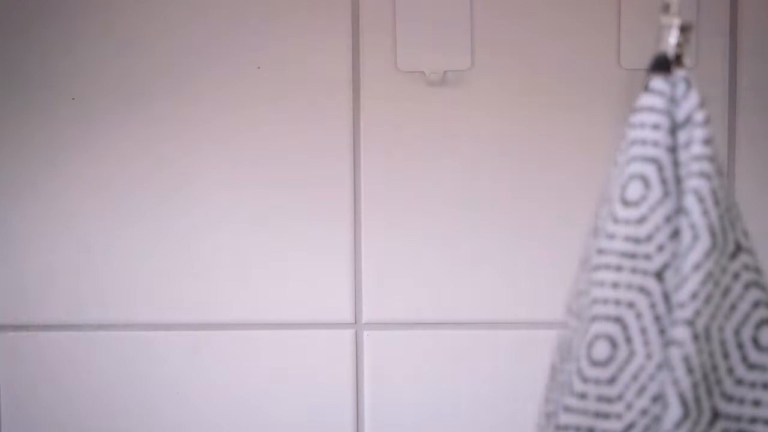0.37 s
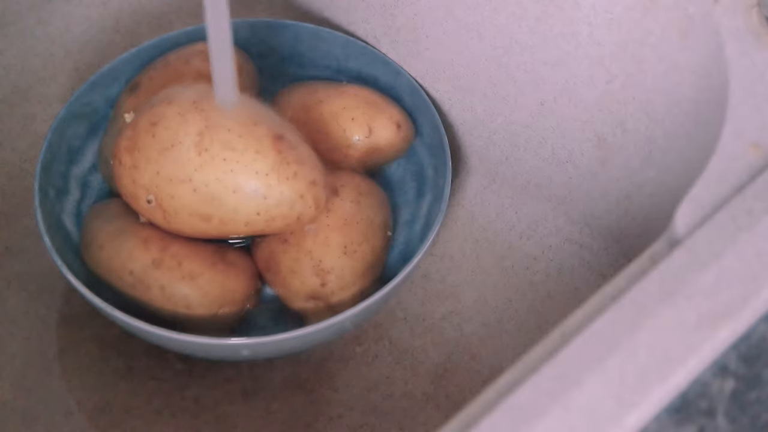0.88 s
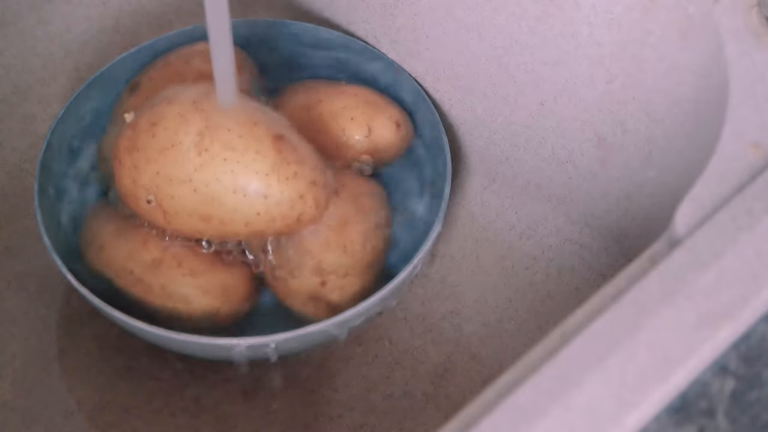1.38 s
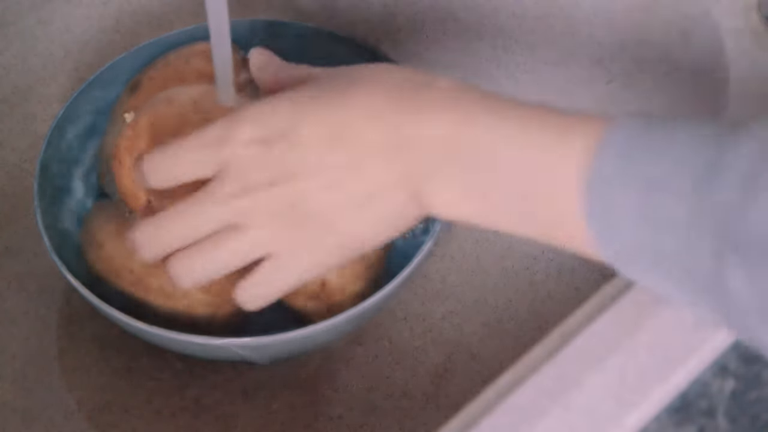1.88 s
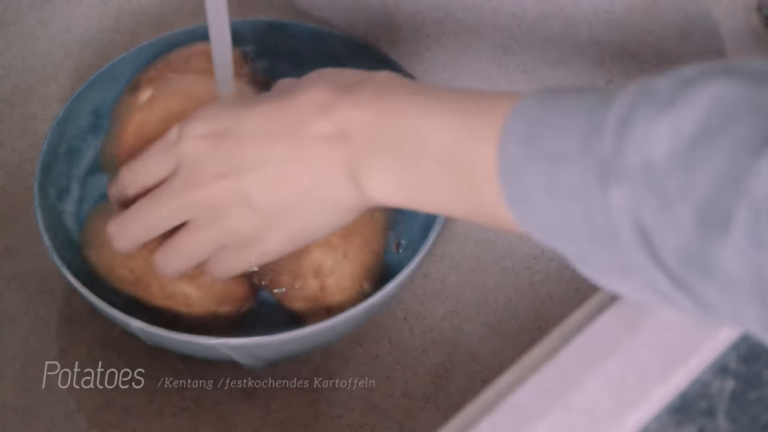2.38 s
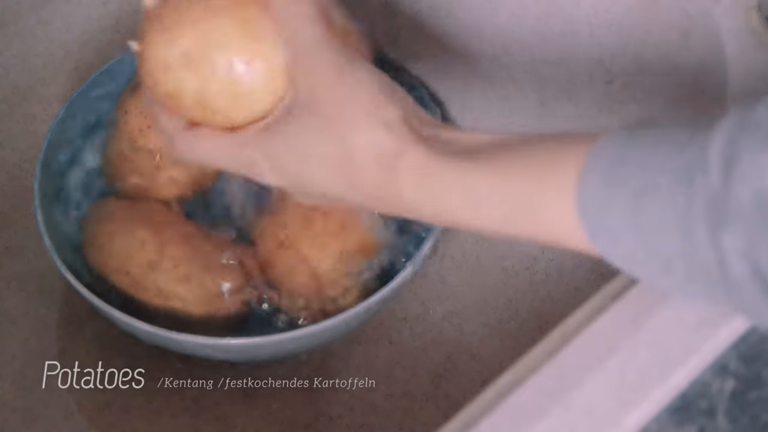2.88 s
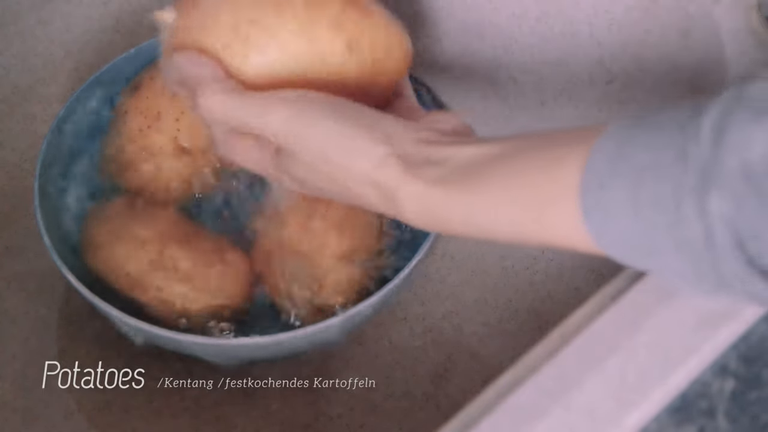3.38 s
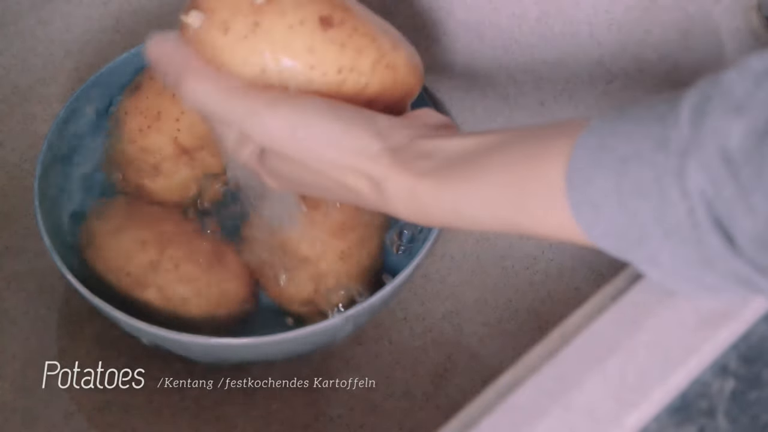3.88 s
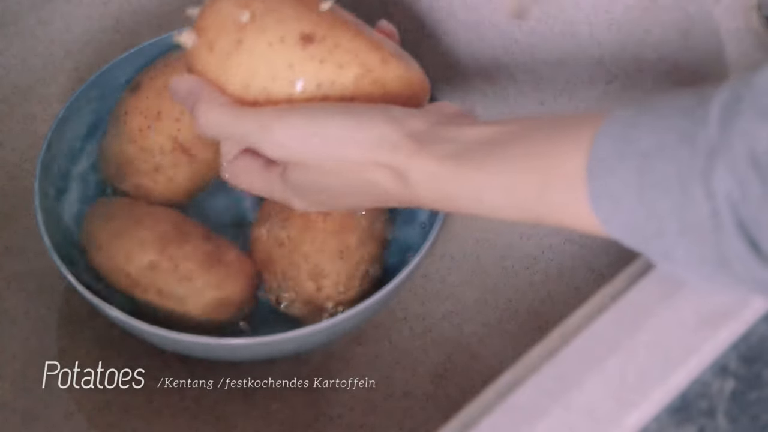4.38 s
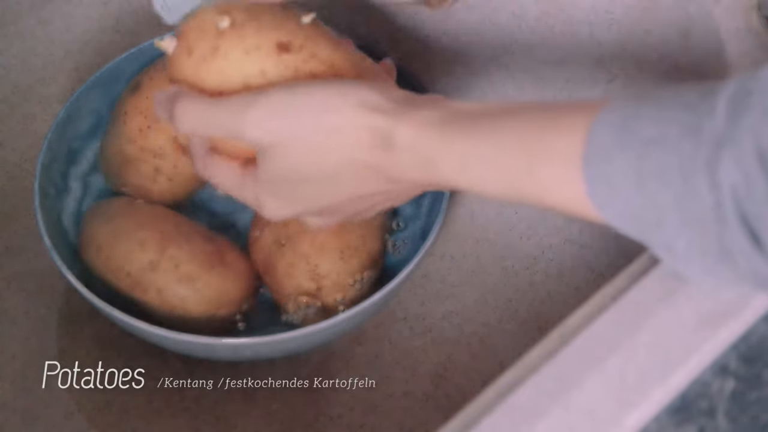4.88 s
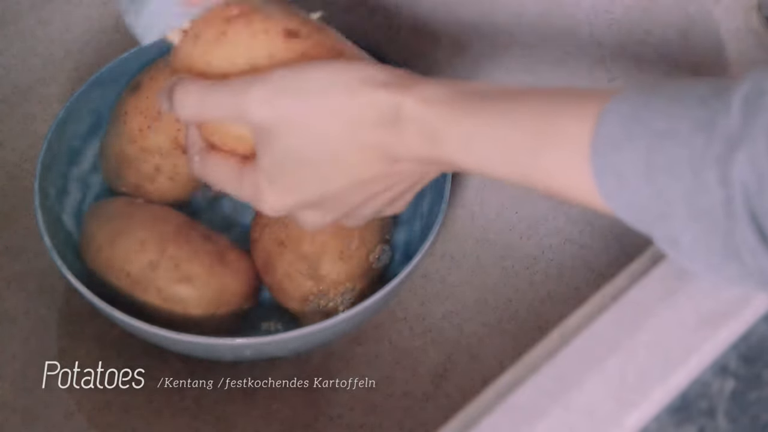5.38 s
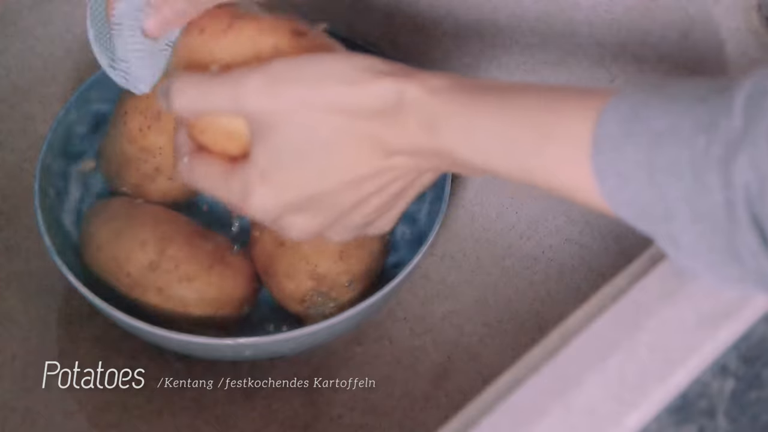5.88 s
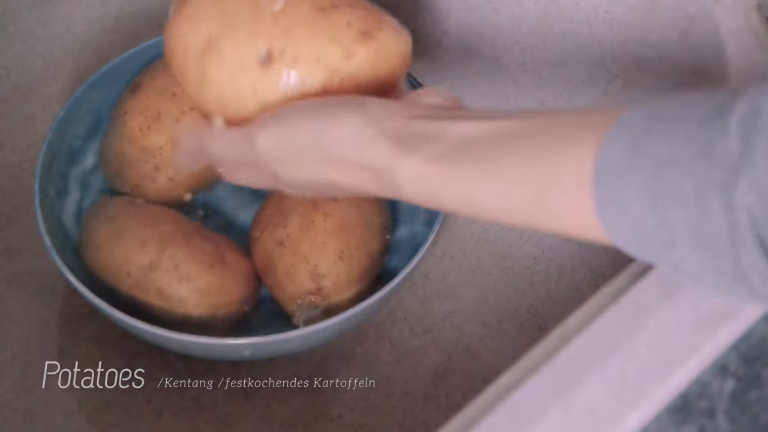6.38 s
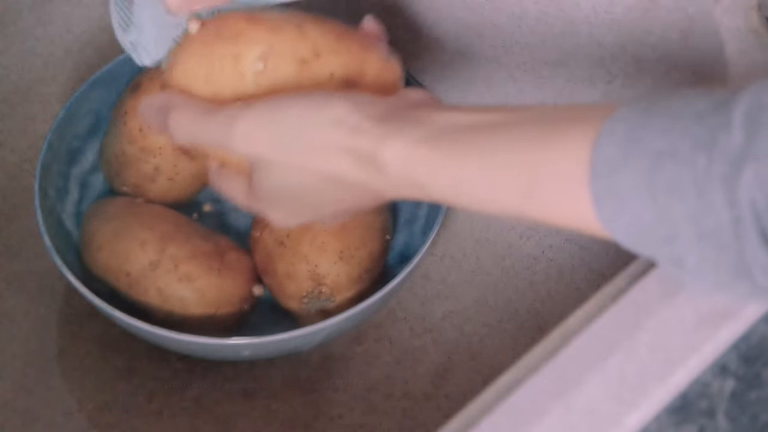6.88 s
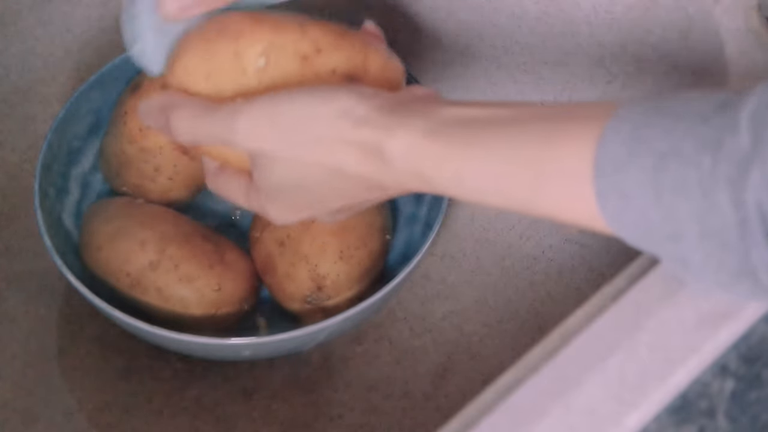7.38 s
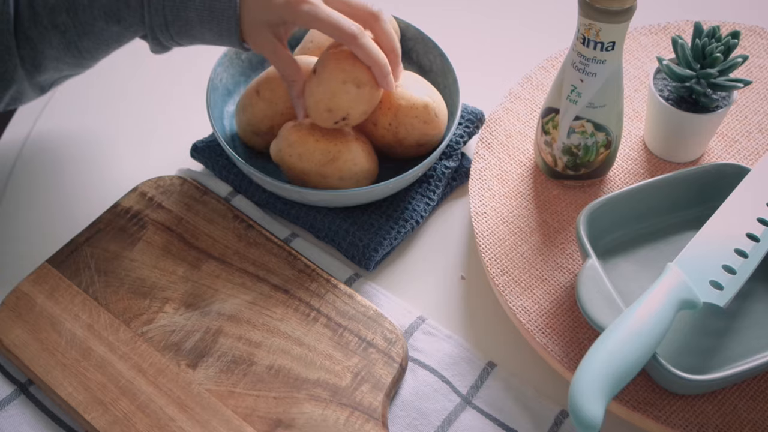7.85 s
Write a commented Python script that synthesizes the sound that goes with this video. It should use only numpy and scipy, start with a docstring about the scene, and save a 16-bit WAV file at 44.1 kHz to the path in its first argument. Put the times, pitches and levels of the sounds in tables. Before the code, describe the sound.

The first 0.75 seconds are a very quiet kitchen: low room noise, faint buzz and tones, one soft rustle at 0.1. A hard cut brings a close tap spray, full by about 1, crackling brightly over potatoes with heavier splashes and bubbling that thickens as the bowl fills. From 1.9 a hand shifts the potatoes; clear ceramic knocks ring near 2.5 and 2.6, then around 3.8. The tap stops about 4.0 to 4.1. Drops plink with rising pitch, wet hands squeak and crackle, and potatoes bump the bowl until 5.5. From 5.1 a rubber brush scrubs in short fizzy rasps, roughly eight per second, growing stronger to 6.3 with sharp wet snaps. It pauses, a few drips sound near 6.8, and strokes resume until 7.8. A hard cut at 7.9 returns to quiet room tone, a tiny tick and a soft low thud at 8.1.

```python
"""Potatoes under the tap

A kitchen tap sprays onto potatoes in a glazed bowl: crackling noise grains over splashes and ringing bubbles.
A hand shifts them and they knock the bowl (ringing modes); the tap shuts and drops fall (rising sines).
Then a rubber brush scrubs a wet potato in quick strokes: a fizz of fine ticks, a resonant rasp, sharp snaps.
The quiet kitchen (shaped noise, a buzz, faint tones) is heard alone before and after, joined by hard cuts."""
import sys
import numpy as np
from scipy import signal
from scipy.fft import rfft, irfft, next_fast_len
from scipy.io import wavfile
from scipy.ndimage import uniform_filter1d

SR = 44100
rng = np.random.default_rng(int(sys.argv[2]) if len(sys.argv) > 2 else 0)


def master(y):
    """Save y as 16-bit WAV."""
    cut = np.clip(np.atleast_2d(y).T, -1, 1)
    pcm = np.round(cut * 32767)  # scale
    wavfile.write(sys.argv[1], SR, pcm.astype(np.int16))


def invert_db(level):
    """Linear amplitude ratio for a level in decibels (20 dB per decade), elementwise."""
    return 10 ** (np.asarray(level, dtype=float) / 20)


N = 363384
SINK_END_S = 7.887   # hard cut back to the quiet kitchen


def rms_one(x):
    """Scale to unit power."""
    return x / np.sqrt(np.mean(x ** 2) + 1e-20)


def seconds():
    """Time of every sample."""
    return np.arange(N) / SR


def in_time(rows):
    """Columns of a curve at every sample; silent outside it."""
    s, *columns = np.transpose(rows)
    return [np.interp(seconds(), s, column, left=-150, right=-150) for column in columns]


def at_hz(points, hz):
    """Read a spectrum on a log-frequency axis."""
    point_hz, value = np.transpose(points)
    return np.interp(np.log(hz + 1), np.log(point_hz), value)


def summed_db(*levels_db):
    """Levels add as powers."""
    return 10 * np.log10(sum(invert_db(2 * db) for db in levels_db))


def drift(corner_hz):
    """Slow random curve of unit power: noise through two equal poles, drawn every 40 samples."""
    pole = np.exp(-80 * np.pi * corner_hz / SR)
    noise = rng.standard_normal(N // 40 + 2002)
    slow = signal.lfilter([1], [1, -2 * pole, pole * pole], noise)[2000:]   # settled part only
    return np.interp(np.arange(N) / 40, np.arange(len(slow)), rms_one(slow))


def dying(clicks, t60):
    """Each click starts at once and dies away, 60 dB in t60 seconds."""
    return signal.lfilter([1], [1, -invert_db(-60 / (t60 * SR))], clicks + 1e-18)


def ring(clicks, hz, t60):
    """A unit click sets a sine of height 1 ringing."""
    radius = invert_db(-60 / (t60 * SR))
    angle = 2 * np.pi * hz / SR
    return signal.lfilter([0, np.sin(angle)], [1, -2 * radius * np.cos(angle), radius * radius], clicks + 1e-18)


def clicks_at(rows, db):
    """One click for each event, timed by the first column."""
    out = np.zeros(N)
    out[(np.array(rows)[:, 0] * SR).astype(int)] = invert_db(db)
    return out


def bright(x, low_hz):
    """Keep the treble only."""
    return signal.sosfilt(signal.butter(2, low_hz, "high", fs=SR, output="sos"), x)


# Stereo width of the noise: pitch_hz, left_right_likeness (0..1)
LIKENESS = [(30, .93), (70, .88), (140, .82), (250, .66), (500, .9), (1000, .96), (2000, .75), (4000, .28),
            (8000, .35), (15000, .42)]


def coloured(envelope, spectrum):
    """Stereo noise under an envelope, filtered to a colour of unit gain; mid and side set its width."""
    size = next_fast_len(N)
    hz = np.arange(size // 2 + 1) * SR / size
    gain = rms_one(invert_db(at_hz(spectrum, hz)))
    alike = np.clip(at_hz(LIKENESS, hz), 0, .99)
    mid, side = rfft(envelope * rng.standard_normal((2, N)), size) * gain
    side = side * np.sqrt((1 - alike) / (1 + alike))
    mid, side = irfft(mid, size)[:N], irfft(side, size)[:N]
    return np.array([mid + side, mid - side])


def grains(per_s, spread_db, t60, share, clump_db):
    """Envelope of tiny bursts at random, in clumps, over a smooth bed; unit power."""
    sizes = invert_db(2 * spread_db * np.minimum(rng.exponential(1, N), 4))
    born = rng.random(N) < per_s * invert_db(clump_db * drift(25)) / SR
    power = dying(sizes * born, t60)
    share = np.clip(share, 0, 1)
    return np.sqrt(1 - share + share * power / power.mean())


def ticks(per_s, spread_db):
    """Lone sharp clicks of either sign, in clumps; unit power."""
    sizes = invert_db(spread_db * np.minimum(rng.exponential(1, N), 5)) * rng.choice([-1, 1], N)
    born = rng.random(N) < per_s * invert_db(4.0 * drift(20)) / SR
    return rms_one(sizes * born)


def blips(per_s, low_hz, high_hz, cycles):
    """Random clicks ring for some cycles at pitches scattered over 16 steps; unit power."""
    sizes = invert_db(3.4 * np.minimum(rng.exponential(1, N), 4)) * (rng.random(N) < per_s / SR)
    dealt = rng.integers(0, 16, N)
    pitches = np.geomspace(low_hz, high_hz, 16)
    return rms_one(sum(ring(sizes * (dealt == k), hz, cycles / hz) for k, hz in enumerate(pitches)))


def lumpy(x, depth_db):
    """Makes noise lumpy: narrow pitch regions swell and fade for some 50 ms each."""
    cells = signal.stft(x, nperseg=1024)[2]
    chance = rng.standard_normal(cells.shape[1:])
    chance = uniform_filter1d(uniform_filter1d(chance, 4, axis=0), 3, axis=1)
    gain = rms_one(invert_db(depth_db * rms_one(chance)))
    return signal.istft(cells * gain, nperseg=1024)[1][:, :N]


def swells(starts, lengths, peaks_db, rise, push, fall):
    """Level in dB of overlapping events: a ramp up to the start, another over the length, a ramp down (dB/s)."""
    t, power = np.arange(0, N, 32) / SR, 1e-15
    for s, length, db in np.broadcast(starts, lengths, peaks_db):
        to_peak = s + length - t
        climb = push * np.minimum(to_peak, length) + rise * np.maximum(s - t, 0)
        below_peak_db = np.where(to_peak > 0, climb, -fall * to_peak)
        power = power + invert_db(2 * np.maximum(db - below_peak_db, -200))
    return np.interp(seconds(), t, 10 * np.log10(power))


# Movement at the sink: time_s, murmur_db (room and water, before each layer's trim),
# leaning_db (hands and arms leaning on the sink)
HANDLING = [(0, -72.5, -79), (.63, -73.5, -79.5), (.74, -81, -90), (.84, -61, -69), (1.0, -59, -70.5),
            (1.7, -60, -69.5), (2.0, -57, -70), (2.7, -55.5, -65), (3.3, -58, -65.5), (4.2, -61, -64),
            (4.4, -61.5, -69), (4.72, -62.5, -66.5), (6.1, -60.5, -63), (6.39, -61, -62), (6.6, -68, -77),
            (6.77, -68, -73), (6.87, -58, -64), (7.4, -56.5, -61), (7.885, -61, -65.5), (7.9, -67, -67),
            (8.24, -66.5, -71.5)]
# Colour of the leaning rumble: pitch_hz, relative_db_per_hz
RUMBLE_COLOUR = [(12, -25), (20, 2.5), (54, 3), (90, -9), (120, -38), (200, -120)]


def rumble():
    """Hands and arms leaning on the sink: wavering deep noise."""
    leaning_db = in_time(HANDLING)[1] + 3 * drift(5.8)
    return coloured(invert_db(leaning_db), RUMBLE_COLOUR)


# Dull thumps through the basin: hit_s, level_db
THUMPS = [(1.99, -61), (3.05, -59), (3.25, -58), (3.53, -60), (3.9, -57.5), (4.36, -53), (4.51, -60),
          (6.87, -73)]
# Colour of the basin: pitch_hz, relative_db_per_hz
BASIN_COLOUR = [(53, -43.5), (90, -16), (129, -1.5), (250, -16), (320, -35.5), (550, -120)]
BASIN_DB, BASIN_FOLLOWS, BUSY_DB = -69.5, 1.07, -59.5   # level at a busy murmur, share of its swing
BASIN_SETTLES_S, BASIN_SETTLES_DB = 5.4, 3   # quieter once no water reaches it


def basin():
    """The basin drums with the water's movement, and dull thumps come through it."""
    murmur_db = in_time(HANDLING)[0]
    drum_db = BASIN_DB + BASIN_FOLLOWS * (murmur_db - BUSY_DB) + 2.5 * drift(3.8)
    drum_db -= BASIN_SETTLES_DB * (seconds() > BASIN_SETTLES_S)
    hit_s, thump_db = np.transpose(THUMPS)
    thumps_db = swells(hit_s, 0, thump_db, rise=400, push=0, fall=90)
    return coloured(invert_db(summed_db(drum_db, thumps_db)), BASIN_COLOUR)


# Colour of the low noise at the sink: pitch_hz, relative_db_per_hz
SINK_COLOUR = [(120, -29), (200, 1.5), (490, -3.5), (539, 7), (738, -0.5), (848, 1), (1200, -3.5),
               (1600, -24), (2080, -32), (3520, -120)]
# Colour of the low noise in the quiet kitchen: pitch_hz, relative_db_per_hz
STILL_ROOM_COLOUR = [(60, -12), (120, -3), (300, -2.5), (600, -1.5), (1200, -7), (2000, -30), (3500, -120)]
AT_SINK_S = (.75, SINK_END_S)   # the part at the sink, between the hard cuts


def murmur():
    """Low noise at the sink, lumpy in pitch and time; smooth duller noise in the quiet kitchen."""
    level = invert_db(in_time(HANDLING)[0] - 5.0)
    at_sink = (seconds() > AT_SINK_S[0]) * (seconds() < AT_SINK_S[1])
    sink_noise = lumpy(coloured(level, SINK_COLOUR), depth_db=4.0)
    return np.where(at_sink, sink_noise, coloured(level, STILL_ROOM_COLOUR))


# Colour of the broad hiss: pitch_hz, relative_db_per_hz
AIR_COLOUR = [(590, -59), (1000, -66), (1290, -17), (1390, -12), (3830, -21), (15500, -21.5)]
# Hiss, louder while water runs and drains: time_s, level_db
AIR_LEVEL = [(0, -76), (.63, -76), (.65, -80.5), (.75, -81), (.8, -60.5), (7.885, -72), (7.89, -73),
             (8.24, -74)]


def air():
    """Broad hiss of smooth shaped noise."""
    return coloured(invert_db(in_time(AIR_LEVEL)[0]), AIR_COLOUR)


def buzz():
    """A faint low buzz: one dull puff of noise 62 times a second."""
    cycles = np.diff(np.floor(np.arange(N + 1) * 62 / SR))
    colour = [(100, -42.5), (300, -2), (900, -23), (2000, -18), (4000, -43)]   # pitch_hz, relative_db_per_hz
    return coloured(invert_db(-81) * rms_one(dying(cycles, 0.019)), colour)


# Faint tones of the quiet kitchen before the water: pitch_hz, level_db (before trim)
TONES_EARLY = [(360.7, -90), (452.2, -84), (1308, -106), (1416, -101), (1685, -103), (1836, -101),
               (8096, -89), (8156, -100)]
# Faint tones of the quiet kitchen at the end: pitch_hz, level_db (before trim)
TONES_LATE = [(839.8, -88), (1265, -83.5), (2062, -93), (2369, -94), (3203, -92), (3698, -91)]


def steady_tones():
    """Faint steady sines, one set at each end."""
    t = seconds()
    early = sum(invert_db(db - 1.5) * np.sin(2 * np.pi * hz * t) for hz, db in TONES_EARLY)
    late = sum(invert_db(db + 6.0) * np.sin(2 * np.pi * hz * t) for hz, db in TONES_LATE)
    return (t < .64) * early + (t > SINK_END_S) * late


def rustle():
    """One brief soft rustle in the opening quiet: a held burst of mid-pitched noise."""
    level_db = swells(.116, 0.077, -70.5, rise=700, push=0, fall=110)
    colour = [(800, -28), (1200, -17), (1480, -7), (1800, -16), (3000, -27), (4500, -44)]   # pitch_hz, relative_db_per_hz
    return coloured(invert_db(level_db), colour)


# Tap flow, heard as fine spray: time_s, level_db
TAP_FLOW = [(0.74, -83), (0.752, -82), (0.758, -62), (0.79, -46), (0.85, -43), (0.95, -37), (1.1, -36.5),
            (1.4, -34.5), (2.1, -35.5), (2.8, -35.5), (2.86, -38.5), (3.1, -38.5), (3.9, -38), (3.97, -44),
            (4.05, -48), (4.11, -64), (4.2, -63)]
# The jet spurts or is crossed by the hand: time_s, spray_change_db, splash_change_db
SPURTS = [(1.025, 2, 7), (1.084, 3.5, 6.5), (1.135, 4, 1.5), (1.2, 3, 3.5), (1.23, -2, 2), (1.31, 4, -0.5),
          (1.69, -5.5, 4.5), (2.32, 1, -2), (2.6, 2, 1), (2.77, 3.5, 1.5), (3.14, 4, 0), (3.2, -6, -1.5)]
SPURT_S = 0.018   # half width of a bump, at 1/e of its height
SPLASH_DB, SPLASH_FOLLOWS, FULL_FLOW_DB = -47.5, 0.67, -35.5   # level at full flow, share of its swing
SPLASH_START_S, SPLASH_RISE_DB_PER_S = 0.84, 400   # it is full only once the potatoes are wet
SPLASH_GAIN_DB_PER_S = 0.74   # and grows as the bowl fills


def flow():
    """Levels of spray and splash: both follow the tap and jump with each spurt."""
    t, (flow_db,) = seconds(), in_time(TAP_FLOW)
    spray_db = flow_db.copy()
    splash_db = SPLASH_DB + SPLASH_FOLLOWS * (flow_db - FULL_FLOW_DB)
    splash_db -= SPLASH_RISE_DB_PER_S * np.maximum(SPLASH_START_S - t, 0)
    splash_db += SPLASH_GAIN_DB_PER_S * (t - SPLASH_START_S)
    for s, more_spray_db, more_splash_db in SPURTS:
        bump = np.exp(-((t - s) / SPURT_S) ** 2)
        spray_db += more_spray_db * bump
        splash_db += more_splash_db * bump
    return spray_db, splash_db


# Colour of the fine spray: pitch_hz, relative_db_per_hz
SPRAY_COLOUR = [(2350, -31.5), (4000, -18), (5460, -15), (7380, -6), (11700, 2.5), (13200, 4),
                (14500, -1.5), (15200, 2), (15500, -8)]
# Colour of the heavier water: pitch_hz, relative_db_per_hz
SPLASH_COLOUR = [(590, -30), (1000, -14.5), (1070, -18), (1260, -3), (1900, 5), (2660, 2), (3990, 3),
                 (5440, 1), (7000, 1.5), (9100, -29), (15400, -120)]


def tap():
    """The aerated jet breaks into crackling spray; heavier water splashes and traps ringing bubbles."""
    spray_db, splash_db = flow()
    flutter = drift(38)
    spray = invert_db(spray_db + 1.44 * flutter) * grains(830, 8.9, 0.0025, 0.17, clump_db=8.0)
    splash = invert_db(splash_db + 0.3 * flutter + 0.25 * drift(2.5))
    splash = splash * grains(500, 11.0, 0.0043, 0.13, clump_db=3.5)
    droplets = invert_db(spray_db - 17.0) * bright(ticks(650, 1.3), 12000)   # single drops hitting skin and glaze
    froth = invert_db(splash_db - 19.0) * blips(500, 1075, 4680, 98.0)
    splashing = lumpy(coloured(splash, SPLASH_COLOUR), depth_db=1.5)
    return coloured(spray, SPRAY_COLOUR) + droplets + splashing + froth


BLOBS_S = (.75, 6.2)   # first and last moment


def low_blobs():
    """Short tonal blobs lie over the low noise: clicks ringing at scattered low pitches."""
    sounding = (seconds() > BLOBS_S[0]) * (seconds() < BLOBS_S[1])
    return sounding * invert_db(in_time(HANDLING)[0] - 7.0) * blips(200, 319.7, 1577, 81.0)


# Potatoes knocking the bowl: hit_s, upper_modes_db, low_modes_db (below 700 Hz), both before trim
KNOCKS = [(1.888, -61, -62), (1.967, -69, -55), (2.024, -48, -58), (2.084, -48.5, -57), (2.473, -48, -65),
          (2.513, -33.5, -51), (2.6005, -36.5, -59), (2.73, -62, -53), (2.852, -49.5, -71),
          (2.921, -43, -64), (3.428, -56, -70), (3.486, -69, -58), (3.7155, -58, -70), (3.772, -41.5, -70),
          (3.834, -48.5, -71.5), (3.891, -41.5, -70), (4.178, -46, -55.5), (4.249, -52, -77),
          (4.322, -48, -70), (4.411, -47, -56), (4.437, -50, -69), (4.485, -37.5, -45), (4.55, -50, -56),
          (4.604, -47, -53), (4.756, -53, -68), (4.915, -51, -59), (4.961, -51, -48.5), (5.0265, -61, -60),
          (5.1248, -62, -58), (5.246, -58, -51), (5.325, -54, -60), (5.357, -62, -61), (5.418, -50, -56),
          (5.459, -62, -55), (5.5, -63, -61), (5.526, -73, -63)]
# Ringing modes of the bowl: pitch_hz, relative_db, t60_s
BOWL_MODES = [(452, -8, 0.35), (543.4, 6, 0.17), (584.6, 5.5, 0.14), (861.5, 6, 0.088), (939, 7, 0.085),
              (1730, -5, 0.28)]
# Between the knocks the potatoes keep nudging the bowl; level before each mode's own
JOSTLE_S, JOSTLES_PER_S, JOSTLE_DB = (4.1, 6.2), 18, -77.5


def bowl():
    """Wet potatoes land and grind a moment, ringing the bowl; the spot sets what the low modes get."""
    upper_db, low_db = np.transpose(KNOCKS)[1:]
    chance_db = rng.normal(0, 2.0, (len(KNOCKS), len(BOWL_MODES)))
    t = seconds()
    nudged = (rng.random(N) < JOSTLES_PER_S / SR) * (t > JOSTLE_S[0]) * (t < JOSTLE_S[1])
    ringing = 0
    for k, (hz, db, t60) in enumerate(BOWL_MODES):
        blow_db = low_db - 5.5 if hz < 700 else upper_db - 14.0
        blows = clicks_at(KNOCKS, blow_db + db + chance_db[:, k])
        blows += nudged * invert_db(JOSTLE_DB + db + 4.9 * rng.standard_normal(N))
        grind = invert_db(-27.0) * dying(blows, .16) * rng.standard_normal(N)
        ringing = ringing + ring(blows + grind, hz, t60)
    contact = np.hanning(26) / 12.5   # a soft contact has no crack
    return bright(signal.lfilter(contact, [1], ringing), 570)


# Drops falling into the bowl: start_s, level_db (before its onset and decay), bubble_hz (before rise and waver)
DRIPS = [(2.972, -42, 1220), (2.995, -45, 1210), (3.05, -45, 1200), (4.1225, -44, 4330),
         (4.1794, -48, 2320), (4.2767, -45, 3410), (4.3201, -47, 5100), (4.3562, -33.5, 2700),
         (4.3744, -38.5, 3550), (4.4918, -48, 1700), (4.51, -50, 1990), (4.528, -44, 1980),
         (4.5544, -45, 1950), (4.5855, -44.5, 1920), (4.6194, -51, 2050), (4.6994, -59, 4300),
         (4.8663, -53, 3500), (4.958, -40, 590), (6.744, -54, 1990), (6.767, -48, 1858), (6.771, -51, 2290),
         (6.7894, -58, 1980), (6.83, -40, 2060)]


def drips():
    """Each drop leaves a bubble that swells in a few ms, wavers, rises in pitch and dies."""
    out, t = np.zeros(N), np.arange(SR // 8) / SR
    wobble = rng.normal(0, 1, (len(DRIPS), 32))
    for (s, db, hz), chance in zip(DRIPS, wobble):
        waver = 0.0037 * np.interp(t * 256, np.arange(32), chance)
        pitch = hz * (1 + 0.85 * t + waver)
        level = invert_db(db - 60 * t / 0.041) * (1 - np.exp(-t / 0.00082))
        i = int(s * SR)
        out[i:i + len(t)] += level * np.sin(2 * np.pi * np.cumsum(pitch) / SR)
    return out


# Wet bristles and skin snapping free: start_s, crack_db (before trim), body_db (duller, under it)
SNAPS = [(4.075, -33, -55), (4.157, -42, -76), (4.271, -38, -66), (4.3595, -50, -64), (4.4194, -40, -65),
         (4.627, -43, -71), (4.754, -32, -75), (4.8908, -34, -59), (5.0792, -55, -61), (5.1642, -45, -71),
         (5.2224, -50, -56), (5.247, -22.5, -65), (5.393, -32, -66), (5.497, -29.5, -68),
         (5.5643, -46, -55), (5.6117, -50, -54.5), (5.742, -39, -52), (5.773, -28.5, -45),
         (5.795, -19, -62), (5.893, -22.5, -40), (5.979, -47, -51), (6.0325, -40, -42), (6.1056, -33, -39),
         (6.119, -33, -46), (6.1523, -44, -44), (6.2438, -38, -49), (6.2562, -36, -42.5),
         (6.2884, -28, -44), (6.3794, -46, -56), (6.458, -48, -64), (6.541, -53, -64), (6.59, -45, -75),
         (6.6288, -50, -77), (6.7286, -60, -78), (6.818, -46, -50), (6.8718, -34, -44), (6.9485, -45, -51),
         (6.99, -31, -50), (7.1015, -31, -43.5), (7.1177, -40, -47), (7.129, -21, -50),
         (7.1334, -32, -35.5), (7.241, -33, -56), (7.2537, -20, -51), (7.3568, -44, -50), (7.388, -27, -52),
         (7.4954, -37, -61), (7.5074, -33, -50), (7.643, -48, -55), (7.6932, -42, -47), (7.7864, -31, -47),
         (7.8103, -28, -58), (7.8214, -45, -47)]
SNAP_TEARS_DB, SNAP_HOLD_S_PER_DB = -28, 0.0012   # stronger snaps tear for a moment before they die


def snaps():
    """Envelopes of the bright crack and the duller body of each snap; the body opens with a sharp edge."""
    crack, t = np.zeros(N), np.arange(SR // 10) / SR
    for s, db, _ in SNAPS:
        i = int(s * SR)
        hold = SNAP_HOLD_S_PER_DB * max(db - SNAP_TEARS_DB, 0)
        crack[i:i + len(t)] += invert_db(db - 10.5 - 60 * np.maximum(t - hold, 0) / 0.021)
    hits = clicks_at(SNAPS, np.array(SNAPS)[:, 2])
    return crack, dying(hits, 0.051) + invert_db(1) * dying(hits, 0.009)


# Water left on hands and potato, draining: time_s, level_db (before trim)
WETNESS = [(4.05, -64), (4.3, -58.5), (4.6, -61.5), (4.74, -83), (5.05, -72), (5.3, -67), (6.3, -60),
           (6.46, -62.5), (6.7, -76.5), (6.8, -78), (6.9, -78), (7.88, -51.5)]
# Wet hands squeeze the potato: peak_s, fizz_db, rasp_db (before trim)
SQUEEZES = [(4.12, -63, -50.5), (4.155, -50.5, -65), (4.275, -62, -50.5), (4.358, -51.5, -42.5),
            (4.42, -52, -52), (4.48, -54.5, -58), (4.53, -62, -51), (4.6, -65, -62), (4.63, -59, -77),
            (4.765, -53.5, -57.5), (4.891, -53.5, -50), (4.95, -57, -57)]
# Brush strokes: bite_s (bristles bite), push_s, fizz_db, rasp_db (at the end of the push, before trim)
STROKES = [(5.08, 0.082, -50, -50.5), (5.221, 0.057, -43.5, -41.5), (5.345, 0.049, -45.5, -43),
           (5.492, 0.051, -45, -45.5), (5.63, 0.031, -44, -45), (5.744, 0.048, -37.5, -38.5),
           (5.87, .03, -39, -40.5), (5.985, 0.047, -37, -36), (6.1, 0.041, -38.5, -37.5),
           (6.252, 0.044, -35, -34.5), (6.822, 0.049, -41, -42), (6.952, 0.048, -40.5, -42),
           (7.097, 0.056, -34, -36.5), (7.241, 0.043, -33, -37.5), (7.36, 0.036, -38, -39),
           (7.498, 0.032, -43.5, -43), (7.64, 0.036, -41, -44), (7.785, 0.026, -42.5, -48.5)]


def rubbing():
    """Levels of fizz and rasp: squeezes and strokes over draining water."""
    wet_db, = in_time(WETNESS)
    s, fizz, rasp = np.transpose(SQUEEZES)
    squeeze_fizz_db = swells(s, 0, fizz, rise=1500, push=0, fall=118)
    squeeze_rasp_db = swells(s, 0, rasp, rise=1500, push=0, fall=135)
    # steep up to the bite, slower while the hand pushes, down as the brush lifts
    bite, push, fizz, rasp = np.transpose(STROKES)
    brush_fizz_db = swells(bite, push, fizz, rise=475, push=127, fall=294)
    brush_rasp_db = swells(bite, push, rasp, rise=475, push=78, fall=182)
    fizz_db = summed_db(wet_db, squeeze_fizz_db, brush_fizz_db)
    rasp_db = summed_db(wet_db + 1, squeeze_rasp_db, brush_rasp_db)
    return fizz_db, rasp_db


# The hollow between brush and potato changes with the grip: time_s, pitch_hz
HOLLOW = [(5.1, 2140), (5.6, 2200), (5.75, 2230), (6.4, 2190), (6.75, 1970), (6.95, 2280), (7.88, 2220)]


def hollow(x, width):
    """A resonance that follows the grip, stepped block by block; width in Hz."""
    out, state = np.zeros_like(x), np.zeros((2, 2))
    s, hz = np.transpose(HOLLOW)
    for i in range(int(s[0] * SR), N, 256):
        centre = np.interp(i / SR, s, hz)
        b, a = signal.iirpeak(centre, centre / width, SR)
        out[:, i:i + 256], state = signal.lfilter(b, a, x[:, i:i + 256], zi=state)
    return out


# Colour of the wet fizz: pitch_hz, relative_db_per_hz
FIZZ_COLOUR = [(2350, -42), (4000, -2.5), (5190, -2.5), (8120, 2), (10300, 5.5), (12400, 9), (14200, 1),
               (15500, 1)]
# Colour of the rasp: pitch_hz, relative_db_per_hz
RASP_COLOUR = [(350, -14.5), (600, -14), (915, -16.5), (1420, -10.5), (1540, -11), (2830, -4), (3780, -2),
               (5200, -13), (7000, -13), (9100, -22.5), (15400, -120)]
# Brush and potato resonances: pitch_hz, width_hz, level_db (before trim)
BRUSH_MODES = [(2050, 40, -10), (2857, 250, -7), (3210, 56, -7), (3734, 41, -13), (5300, 100, -42.5)]


def scrub():
    """Bristles flick over wet skin: a fizz of fine ticks and a rasp that rings the brush."""
    fizz_db, rasp_db = rubbing()
    crack, body = snaps()
    fizz = invert_db(fizz_db - 4.5) * grains(890, 5.7, 0.06, 0.98, clump_db=6.5)
    rasp = invert_db(rasp_db - 7.0) * grains(300, 2.3, 0.021, 0.64, clump_db=1.5)
    rasping = lumpy(coloured(rasp + body, RASP_COLOUR), depth_db=2.5)
    fizzing = coloured(fizz + crack, FIZZ_COLOUR)
    wetness_db = uniform_filter1d(np.clip(fizz_db - rasp_db, -12, 9), size=2000)
    fizzing += invert_db(2.3 * wetness_db - 0.5) * bright(fizzing, 12900)   # wetter strokes fizz brighter
    out = fizzing + rasping
    out += invert_db(rasp_db - 13.5) * blips(400, 1916, 5120, 40.0)
    out += bright(invert_db(fizz_db - 5.5) * ticks(440, 2.3), 3800)
    out += invert_db(-2.0) * hollow(rasping, width=130)
    for hz, width, level_db in BRUSH_MODES:
        out += invert_db(level_db - 3.5) * signal.lfilter(*signal.iirpeak(hz, hz / width, SR), rasping)
    return out


def tick():
    """One small bright tick in the quiet kitchen: a dying burst of noise with the spray's colour."""
    return coloured(dying(clicks_at([(7.929,)], -56), .012), SPRAY_COLOUR)


def thud():
    """Something is set down softly on the worktop: a softened click rings one low mode."""
    blow = signal.lfilter(np.hanning(100) / 50, [1], clicks_at([(8.09,)], -56))
    return ring(blow, hz=193, t60=0.27)


def kitchen():
    """The room and the sink's body: low noises, hiss, buzz, faint tones and small single sounds."""
    bed = rumble() + basin() + murmur() + air() + buzz() + steady_tones()
    return bed + rustle() + tick() + thud()


def sink(x, wet_db, t60):
    """The hard basin answers with a short dense tail of dying noise, wider in the treble."""
    t = np.arange(SR // 4) / SR
    mid, side = rng.standard_normal((2, len(t))) * invert_db(-60 * t / t60) * (t > .002)
    side = .6 * side + .5 * bright(side, 2500)
    tail = np.array([mid + side, mid - side])
    tail *= invert_db(wet_db) / np.sqrt(np.sum(tail ** 2, axis=1, keepdims=True))
    return x + signal.fftconvolve(x, tail, axes=1)[:, :N]


# How deep the narrow holes cut: pitch_hz, depth_db (per spread above the threshold)
HOLE_DEPTH = [(200, 0), (350, 16), (1000, 32), (1500, 32), (2500, 16), (5000, 10), (6500, 0)]
HOLES_S, HOLES_ABOVE = (.76, 4.35), .75   # start and end in s; how rare a hole is, in spreads


def narrow_holes(x):
    """The loud part has narrow holes in pitch, some 60 ms each."""
    hz, s, cells = signal.stft(x, SR, nperseg=2048, noverlap=1536)
    chance = rng.standard_normal(cells.shape[1:])
    chance = uniform_filter1d(uniform_filter1d(chance, 5, axis=0), 7, axis=1)
    loud_part = (s > HOLES_S[0]) * (s < HOLES_S[1])
    excess = np.maximum(rms_one(chance) - HOLES_ABOVE, 0) - .05   # the rest is lifted a little
    loss_db = at_hz(HOLE_DEPTH, hz)[:, None] * loud_part * excess
    return signal.istft(cells * invert_db(-loss_db), SR, nperseg=2048, noverlap=1536)[1][:, :N]


def scene():
    """Water, scrubbing, drips and knocks end at the cut to the quiet kitchen."""
    before_cut = seconds() < SINK_END_S
    room = kitchen()
    water = sink(tap() + scrub(), wet_db=-5.5, t60=0.079)
    pings = sink(low_blobs() + bowl() + drips() + np.zeros((2, N)), wet_db=-8.0, t60=0.073)
    return narrow_holes(water * before_cut + room) + pings * before_cut


def low_pass(x):
    """Removes everything above the highest recorded frequency."""
    return signal.sosfilt(signal.butter(12, 16340, fs=SR, output="sos"), x)


def record(dry):
    """The top is cut steeply; an all-pass makes the right port hear a fraction of a sample late."""
    mix = signal.sosfilt(signal.cheby2(14, 45, 15400, fs=SR, output="sos"), dry)
    mix[1] = signal.lfilter([.2, 1], [1, .2], mix[1])
    return low_pass(mix)


dry = scene()
out = record(dry)
master(out)
```